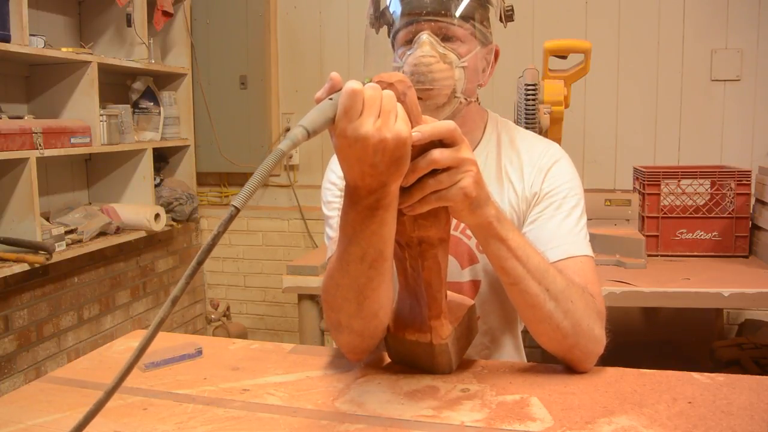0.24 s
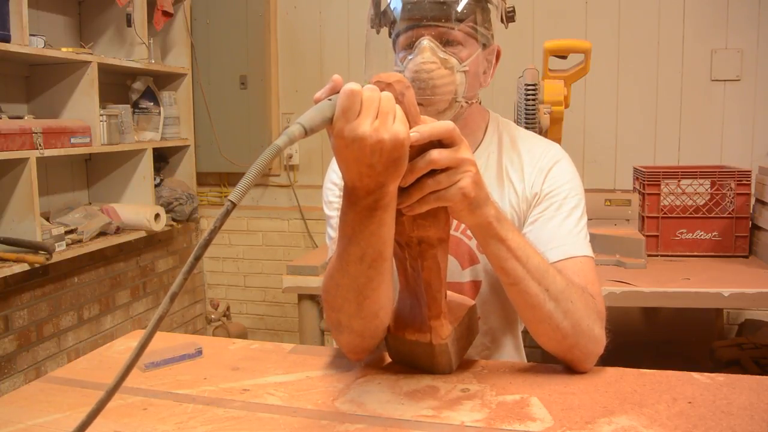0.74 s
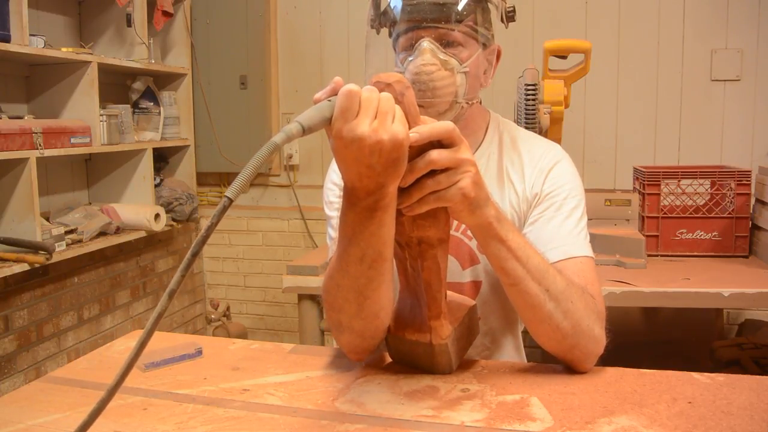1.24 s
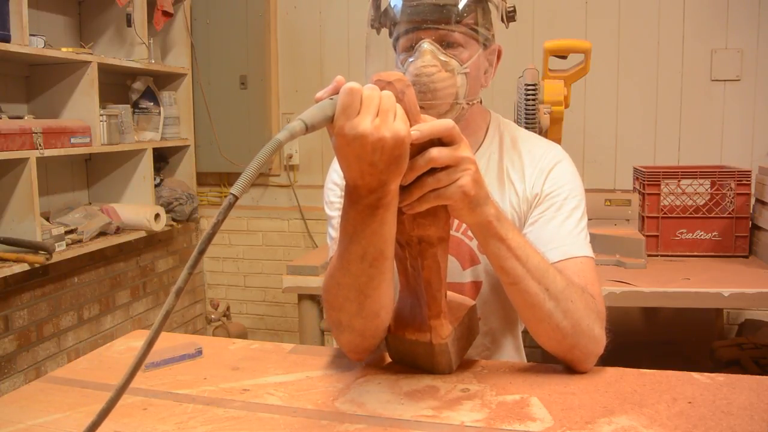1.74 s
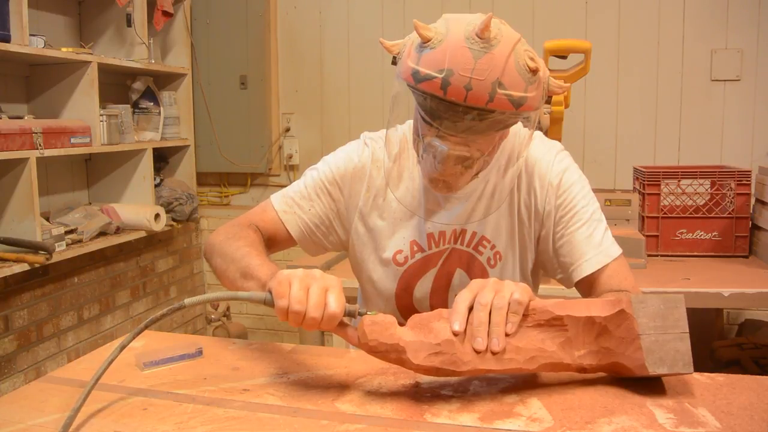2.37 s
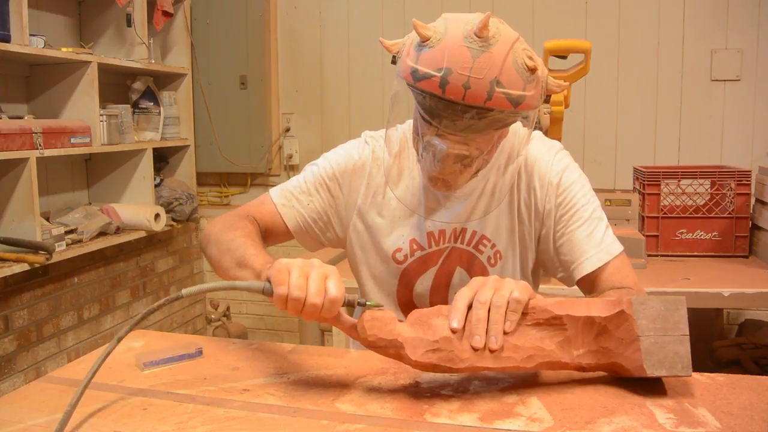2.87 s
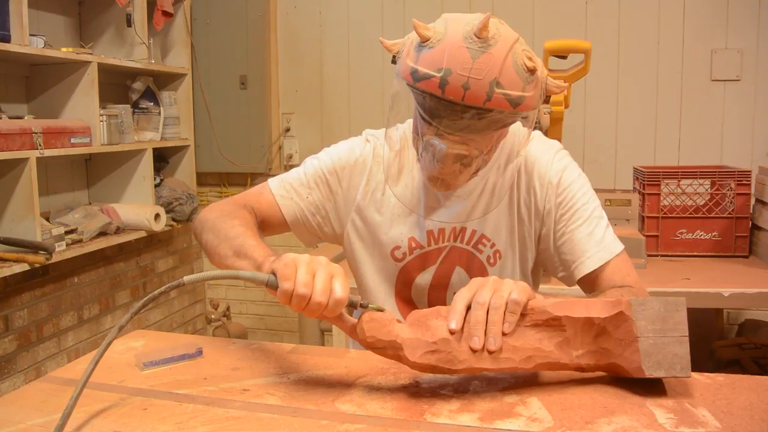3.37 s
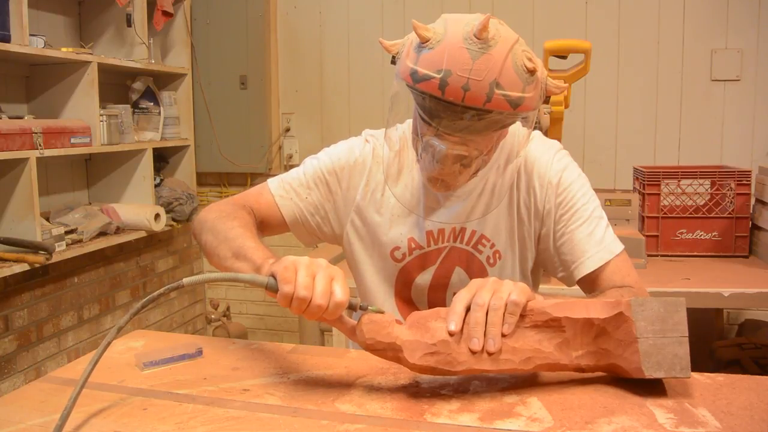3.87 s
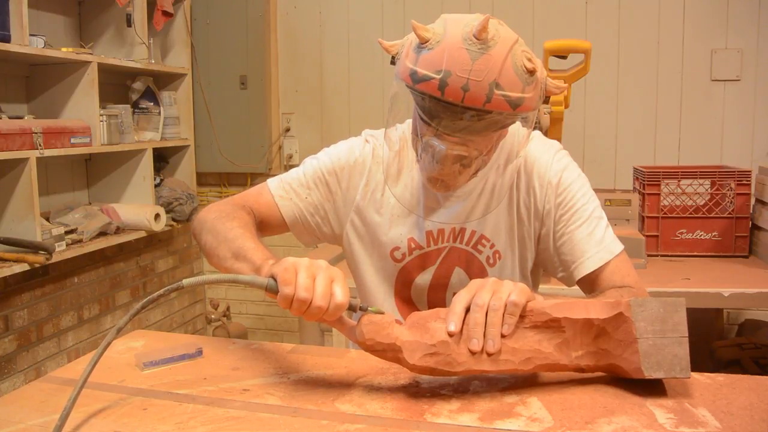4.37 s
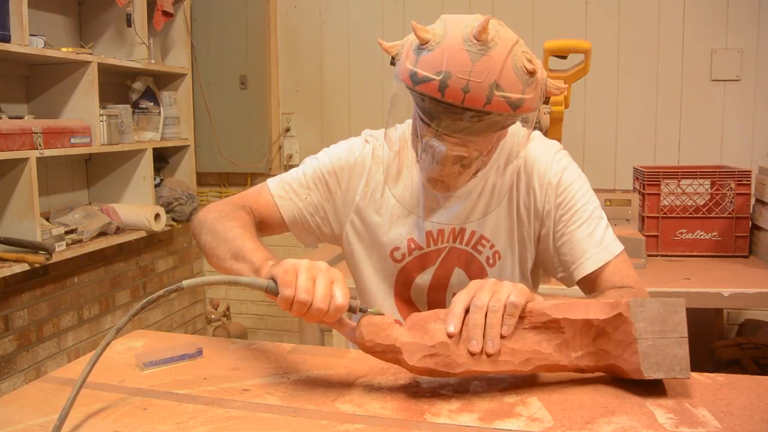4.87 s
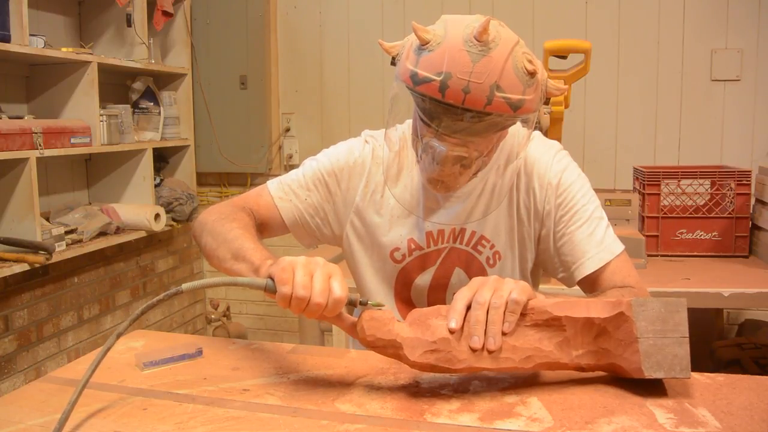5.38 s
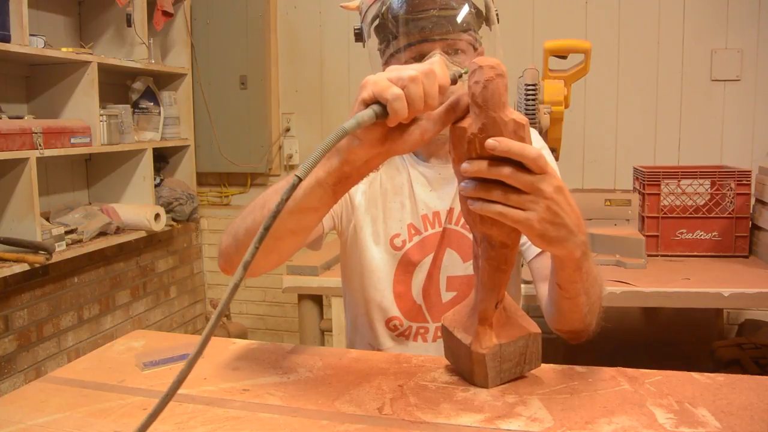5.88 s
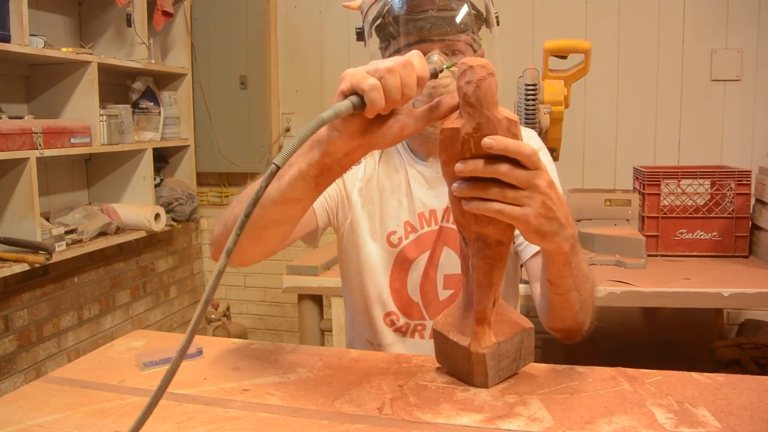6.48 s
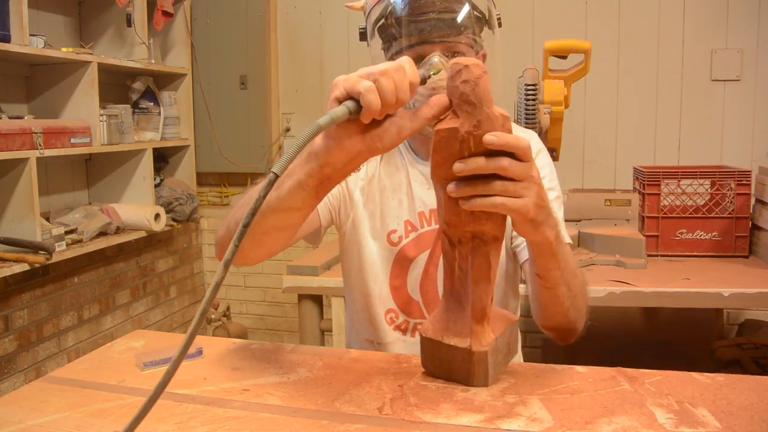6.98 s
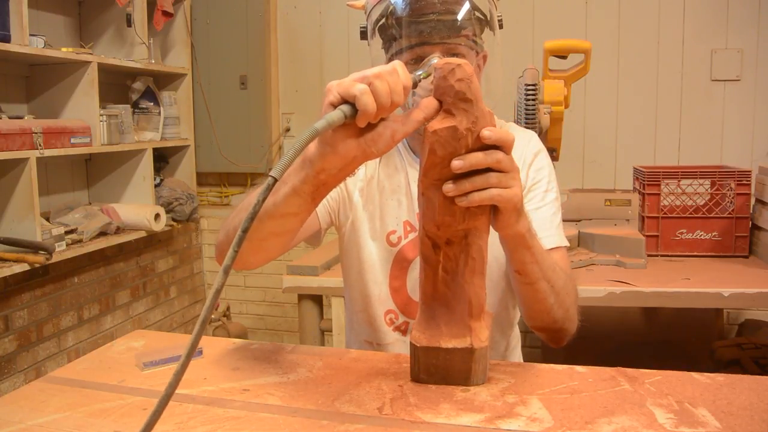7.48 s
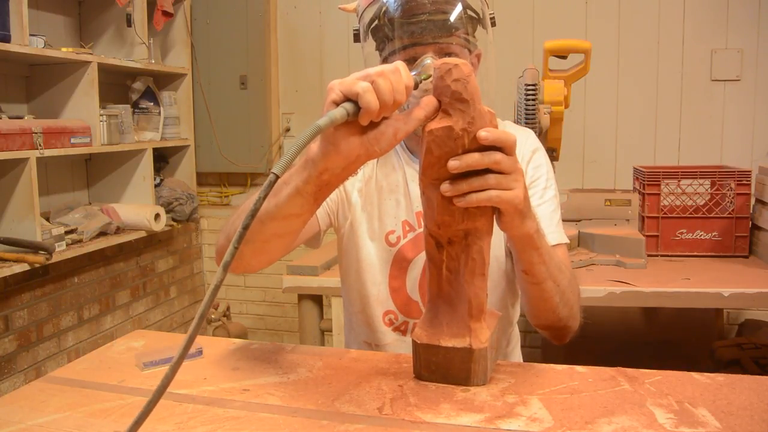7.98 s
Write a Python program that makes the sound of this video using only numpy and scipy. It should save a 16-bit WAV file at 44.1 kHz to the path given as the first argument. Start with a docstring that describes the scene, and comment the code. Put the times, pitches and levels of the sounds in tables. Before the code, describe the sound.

A flexible-shaft rotary tool carves wood, already running at the start and never stopping. Its bright, nasal, buzzing whine is layered with harmonics, rough mains ripple, hissing air and a dry, gritty rasp. From 0 to 2 seconds the pitch wobbles downward and back while short squeals ring out. At 2.0 a soft dull click marks a change of tone; the rasp swells briefly and the block thrums low around 2.2. Squeals return near 2.3, then crowd together from 3.3 to 5.1 as the pitch sags, lowest at about 4.9. A tiny sharp shriek comes at 5.1, then the pitch climbs back. A second, softer click at 5.8 brings another change; after a brief squeal near 5.95 the whine stays higher and steadier, with less thrum, to the end at about 8. Close stereo pickup, noise weighted left, slight wall reflections, barely audible shop rumble and late hum.

```python
"""A flexible-shaft rotary tool carves a block of wood: its motor whines on multiples of the shaft speed,
each with sidebands from the mains ripple. The burr adds chattering tones, a rasp of torn fibres and,
on some strokes, squeals where tones meet a resonance of the wood. A lower shaft speed stands for a harder cut.
Quieter are faint tones between the multiples, a low thrum of the block, hissing air, two dull clicks and the
workshop's rumble and hiss, later with mains hum. The noises are bands of filtered random noise."""
import sys
import numpy as np
from scipy import signal
from scipy.io import wavfile

SR = 44100
rng = np.random.default_rng(int(sys.argv[2]) if len(sys.argv) > 2 else 0)


def store_wav(level_fs):
    """Save 16-bit WAV to argv[1]."""
    pcm = np.round(np.clip(np.atleast_2d(level_fs), -1, 1) * 32767)
    wavfile.write(sys.argv[1], SR, pcm.T.astype(np.int16))


N = 362502
STEP = 16   # samples between the control points of slow changes
TIME = np.arange(N) / SR
SLOW_TIME = np.arange(N // STEP + 2) * STEP / SR
MAINS_RIPPLE_HZ = 120
CRUISE_HZ = 348   # cruising shaft speed, turns per second


def whine(angle, pressure, swell, shade_hz, shade_db, shift_hz, shift_db,
          rough_rate=30, sideband_follow=0.45, shade_width_hz=220, shift_width_hz=200,
          waver_db=1.1, waver_rate=9, grain_roughness=.42, sideband_roughness=.45,
          tooth_ripple=.36, squeal_ripple=.2, squeal_rough_share=.3):
    """Motor and burr sound on multiples of the shaft speed; mains ripple puts a sideband on either side of each."""
    speed = shaft_speed()
    ripple = np.exp(2j * np.pi * MAINS_RIPPLE_HZ * SLOW_TIME)
    turn = np.exp(1j * angle)
    carrier, out = 1, np.zeros((2, N))
    for k, (db, lower_db, upper_db) in enumerate(motor_orders(), 1):
        carrier = carrier * turn
        hz = k * speed
        # the grip changes the level in two regions of pitch
        shade = shade_db * np.exp(-((hz - shade_hz) / shade_width_hz) ** 2)
        shift = shift_db * np.exp(-((hz - shift_hz) / shift_width_hz) ** 2)
        grip = from_db(shade + shift)

        motor = grip * from_db(db + swell.get(k, 0) + waver_db * drift(waver_rate))
        chatter = chatter_power(hz, pressure) * grip ** 2
        squeal = squeal_power(hz)
        # uneven grain roughens the part that the teeth make; a squeal is purer than the chatter
        teeth = np.sqrt(chatter + squeal_rough_share * squeal)
        envelope = np.sqrt(motor ** 2 + chatter + squeal) + grain_roughness * teeth * flutter(rough_rate)

        # the ripple mostly swings the phase, so the two sidebands roughly oppose each other
        swing = ripple * np.exp(2j * np.pi * rng.random())
        cut_ripple = np.sqrt(tooth_ripple ** 2 * chatter + squeal_ripple ** 2 * squeal)
        follow_db = sideband_follow * swell[k] if k in (4, 6) else 0
        for side_db, offset in ((lower_db, -swing.conj()), (upper_db, swing)):
            strength = np.hypot(grip * from_db(side_db + follow_db), cut_ripple)
            grain = 1 + sideband_roughness * pressure * flutter(rough_rate)
            envelope = envelope + strength * grain * offset * np.exp(.5j * drift(2.4))
        start_phase = np.exp(2j * np.pi * rng.random())
        out += tone(envelope * start_phase, carrier, hz.mean())
    return out


# how fast the shaft turns: t/s, turns per second
SHAFT_SPEED = [(0.0, 343.7), (0.46, 344.3), (0.58, 339.3), (0.78, 342.3), (0.94, 337.6), (1.32, 335.4),
               (1.42, 345.5), (1.66, 342.0), (1.92, 331.8), (1.98, 337.0), (2.58, 338.6), (2.78, 344.6),
               (2.88, 342.1), (3.36, 345.7), (3.56, 336.9), (4.08, 331.6), (4.28, 334.5), (4.68, 328.4),
               (4.8, 330.8), (4.92, 322.9), (5.24, 341.8), (5.52, 348.6), (5.78, 344.5), (5.86, 350.2),
               (5.96, 342.7), (6.46, 350.8), (6.82, 347.5), (7.24, 350.7), (7.92, 346.5), (8.2, 349.9)]


def shaft_speed(when=SLOW_TIME):
    """Turns per second; this sets the pitch of every shaft tone."""
    return in_time(SHAFT_SPEED, when)[0]


# motor tones before grip and swells: multiple of shaft speed, level/dB, lower and upper sideband level/dB
MOTOR_TONES = [(1, -40.5, -86.5, -60), (2, -36.5, -60, -52), (3, -40.5, -58, -45.5), (4, -23, -43.5, -33.5),
               (5, -39.5, -52.5, -38), (6, -26.5, -40.5, -30.5), (7, -33, -37.5, -40),
               (8, -41.5, -42, -37.5), (9, -32.5, -44.5, -31.5), (10, -36, -38, -35.5),
               (11, -45.5, -47, -36), (12, -35, -42.5, -42), (13, -41, -41, -36), (14, -46.5, -43, -40)]
# smooth level of the multiples above those: f/Hz, level/dB
TREBLE_TONES = [(5200, -50.5), (6600, -48.5), (7200, -45.5), (8350, -62)]


def motor_orders(count=24, lower_sideband_db=-5, upper_sideband_db=-2.5):
    """Base level of each multiple and of its two sidebands; in the treble the sidebands sit a fixed step below."""
    treble = at_hz(TREBLE_TONES, CRUISE_HZ * np.arange(len(MOTOR_TONES) + 1, count + 1))
    low = [row[1:] for row in MOTOR_TONES]
    return low + [(db, db + lower_sideband_db, db + upper_sideband_db) for db in treble]


# the motor's 4th and 6th multiples swell or sink for a moment:
# start t/s, end t/s, extra level/dB on the 4th, extra level/dB on the 6th
MOTOR_SURGES = [(0.08, 0.463, 3.5, -4.5), (0.496, 0.718, 0, -2), (1.415, 1.58, 4, -2),
                (1.777, 2.016, -0.5, -13), (2.17, 2.283, 2.5, 5.5), (2.37, 2.55, 2.5, 4),
                (2.578, 2.628, -10, -13), (2.72, 3.213, 0.5, -4.5), (4.452, 5.053, 0.5, -4),
                (5.225, 5.7, 1.5, -0.5)]
# the lowest tone dips briefly: t/s, half-length/s, level/dB
LOWEST_DIPS = [(0.2, 0.35, -7), (0.53, 0.04, -8), (0.77, 0.096, -14), (1.43, 0.04, -9), (1.65, 0.08, -19),
               (1.98, 0.036, -12), (2.2, 0.11, -14.5), (2.52, 0.17, -11), (3.58, 0.063, -10),
               (4.18, 0.1, -6), (4.64, 0.1, -8), (5.19, 0.045, -13), (6.0, 0.08, -5)]


def swell_db(speed, lowest_db, third_db, fourth_db, edge_s=0.013):
    """Extra dB by multiple: the 1st, 4th and 6th weaken as the shaft drops below its cruising speed."""
    sag = CRUISE_HZ - speed
    surge_fourth, surge_sixth = sum(np.outer(db, gate(start, end, edge_s)) for start, end, *db in MOTOR_SURGES)
    # the factors of sag are dB per turn per second
    lowest = lowest_db + bumps_db(LOWEST_DIPS) - 0.31 * sag
    fourth = fourth_db + surge_fourth - 0.28 * sag
    sixth = surge_sixth - 0.15 * sag
    return {1: lowest, 3: third_db, 4: fourth, 6: sixth}


# shape of the tooth chatter, tone by tone: f/Hz, relative level/dB
CHATTER_SHAPE = [(340, -56.5), (680, -24), (1020, -7.5), (1400, -23), (1700, -14), (2050, -8), (2350, -8),
                 (2700, -9), (3050, -11), (3500, -10.5), (4100, -16), (4800, -19), (5400, -22), (6200, -20),
                 (7200, -18.5), (8500, -27)]


def chatter_power(hz, pressure, full_load_db=-28.5, load_law=0.44):
    """The teeth strike the wood and strengthen the shaft tones more under a heavier load."""
    bite = from_db(full_load_db) * pressure ** load_law
    return (bite * from_db(at_hz(CHATTER_SHAPE, hz))) ** 2


# firm strokes that set the wood ringing where the burr bites: start t/s, end t/s, ring f/Hz, level/dB
RINGING_STROKES = [(0.36, 0.43, 4820, -35), (0.53, 0.63, 2720, -30), (0.55, 0.68, 5100, -32),
                   (0.82, 0.94, 5080, -31), (0.97, 1.1, 5050, -32), (0.63, 0.93, 2720, -23),
                   (0.7, 0.85, 4790, -37), (0.96, 1.22, 2700, -24), (1.13, 1.22, 3700, -33),
                   (1.17, 1.33, 2350, -31), (1.25, 1.35, 3020, -33), (1.26, 1.4, 2700, -24),
                   (1.55, 1.72, 2740, -31), (1.74, 1.93, 2680, -24), (2.28, 2.58, 4410, -29),
                   (2.35, 2.55, 4060, -34), (2.42, 2.55, 4740, -33), (3.27, 3.43, 2760, -27),
                   (3.25, 3.43, 4830, -30), (3.43, 3.57, 4740, -30), (3.48, 3.8, 5040, -35),
                   (3.5, 3.72, 3700, -33), (3.62, 3.9, 4700, -29.5), (3.66, 3.79, 2690, -27.5),
                   (3.74, 3.9, 3020, -30), (3.76, 4.26, 4000, -32), (3.89, 4.21, 2660, -27),
                   (3.95, 4.5, 4660, -31.5), (4.22, 4.45, 2670, -24), (4.25, 4.43, 3000, -26),
                   (4.28, 4.65, 3660, -31), (4.46, 4.58, 3650, -29), (4.53, 4.86, 2640, -29),
                   (4.7, 5.1, 3950, -34), (4.85, 5.03, 3580, -32), (4.87, 5.0, 4870, -28.5),
                   (5.0, 5.12, 3320, -32), (5.07, 5.14, 2680, -24), (5.727, 5.786, 4810, -28),
                   (5.93, 6.0, 2750, -30), (5.93, 6.0, 3430, -31)]
# the burr catches once and shrieks on several tones: start t/s, end t/s, centre f/Hz, width f/Hz, level/dB
BURR_CATCH = (5.117, 5.137, 4250, 650, -22)


def squeal_power(hz, ring_width_hz=52, edge_s=0.025):
    """Each stroke lifts the tooth tones near a resonance of the wood; the catch lifts a wide band of them."""
    rings = [(start, end, centre, ring_width_hz, db) for start, end, centre, db in RINGING_STROKES]
    power = 0
    for start, end, centre, width, db in rings + [BURR_CATCH]:
        resonance = 1 / (1 + ((hz - centre) / width) ** 2)
        power = power + (from_db(db) * gate(start, end, edge_s) * resonance) ** 2
    return power


def load(free_hz=360, full_sag_hz=30, uneven_db=3.15, uneven_rate=12):
    """Pressure on the burr from how far the shaft is below its free speed, about 1 in a deep cut; grain shakes it."""
    sag = np.maximum(free_hz - shaft_speed(), 1)
    return sag / full_sag_hz * from_db(uneven_db * drift(uneven_rate))


# torn fibres, pitch by pitch: f/Hz, relative level/dB per Hz
FIBRE_NOISE = [(100, -60), (200, -42), (320, -24), (450, -25), (620, -14), (900, -7.5), (1300, 2),
               (1600, -3), (2200, 3.5), (3000, 0.5), (3800, 7.5), (4700, -1), (5500, -11.5), (7000, 1.5),
               (8500, -28)]
# the burr snags briefly: t/s, half-length/s, extra level/dB
BURR_SNAGS = [(2.004, 0.07, 3), (2.2, 0.16, 3.5), (5.128, 0.016, 2), (5.757, 0.015, 3.5), (6.35, 0.031, 3)]


def rasp(angle, pressure, position_db, level_db=-29.7, load_law=0.098, turn_depth=0.42, ripple_depth=0.12):
    """Fibres tear in bursts, once a turn, harder on each push of the mains and where the burr snags."""
    turn_bursts = 1 + turn_depth * np.cos(angle + full_rate(drift(6.6)))
    mains_push = 1 + ripple_depth * np.cos(2 * np.pi * MAINS_RIPPLE_HZ * TIME)
    strength = from_db(level_db + position_db + bumps_db(BURR_SNAGS)) * pressure ** load_law
    return full_rate(strength) * rms_one(turn_bursts * mains_push) * banded_noise(FIBRE_NOISE, patchy_db=1.6)


# faint tones between the shaft multiples; those just above the 4th, 6th and 11th make them throb:
# multiple of shaft speed, relative level/dB
FAINT_TONES = [(3.085, -45), (4.023, -41.5), (6.013, -37.5), (7.17, -44), (11.03, -45)]


def between_tones(angle, position_db, flutter_rate=0.88, level_db=-3.5, waver_db=5.0):
    """Faint tones between the multiples follow the shaft at fixed ratios, each wavering slowly in level."""
    speed = np.mean(shaft_speed())
    out = 0
    for ratio, db in FAINT_TONES:
        strength = from_db(level_db + position_db + db + waver_db * drift(flutter_rate))
        out = out + tone(strength, np.exp(1j * ratio * angle), ratio * speed)
    return out


# low resonances of the block: f/Hz, width f/Hz of each filter pass, relative level/dB
BLOCK_RESONANCES = [(197, 110, -13.5), (485, 47, -0.5), (620, 90, -0.5)]
# the block shudders more, or less, for a moment: t/s, half-length/s, extra level/dB
BLOCK_SHUDDERS = [(1.62, 0.16, -2), (2.22, 0.37, 10), (3.4, 0.18, 3)]


def thrum(pressure, position_db, low_cut_hz=160, load_law=0.6):
    """The cut shakes the low resonances of the block on its bench: noise through narrow filters, twice each."""
    low_cut = signal.butter(4, low_cut_hz, "high", fs=SR, output="sos")
    shake = signal.sosfilt(low_cut, rng.standard_normal(N))
    out = 0
    for hz, width, db in BLOCK_RESONANCES:
        b, a = signal.iirpeak(hz, hz / width, fs=SR)
        ringing = signal.lfilter(b, a, signal.lfilter(b, a, shake))
        out = out + from_db(db) * rms_one(ringing)
    strength = from_db(position_db + bumps_db(BLOCK_SHUDDERS)) * pressure ** load_law
    return full_rate(strength) * rms_one(out)


# rushing air, pitch by pitch: f/Hz, relative level/dB per Hz
AIR_NOISE = [(200, -43.5), (450, -18), (900, 2), (1400, 0), (3000, -5), (5500, 0.5), (7000, 8), (8200, -9),
             (9500, -1)]
# loudness of the hiss: t/s, level/dB
AIR_LOUDNESS = [(0, -35), (2.1, -35.5), (2.9, -34), (3.6, -33.5), (4.3, -38), (5.5, -33.5), (5.9, -35.5),
                (8.2, -34.5)]


def air(ripple_depth=0.043):
    """Brushes and cooling air hiss throughout, pulsing slightly with the mains."""
    level_db, = in_time(AIR_LOUDNESS, TIME)
    pulse = 1 + ripple_depth * np.cos(2 * np.pi * MAINS_RIPPLE_HZ * TIME)
    return from_db(level_db) * pulse * banded_noise(AIR_NOISE, patchy_db=1.0)


# soft dull clicks: t/s, peak level/dB
DULL_CLICKS = [(2.008, -14), (5.777, -16.5)]


def clicks(dull_hz=1800):
    """Single pulses with a quickly fading tail, dulled by a gentle low-pass filter."""
    out = np.zeros(N)
    for s, db in DULL_CLICKS:
        out[round(s * SR)] = from_db(db)
    # the tiny offset keeps the filter away from vanishingly small numbers
    return signal.lfilter([1], [1, -np.exp(-2 * np.pi * dull_hz / SR)], out + 1e-18)


# low rumble of the shop, pitch by pitch: f/Hz, relative level/dB per Hz
SHOP_NOISE = [(30, 22), (70, -2), (120, -1), (200, -14.5), (500, -1), (2000, -35)]


def shop(rumble_db=-80, hum_db=-79, hum_from_s=5.78, hiss_db=-74, hum_waver=1.0, hum_rate=25):
    """A faint lumpy rumble and a thin high hiss, later joined by a wavering mains hum."""
    waver = full_rate(1 + hum_waver * flutter(hum_rate))
    hum_wave = (waver * np.exp(2j * np.pi * MAINS_RIPPLE_HZ * TIME)).real
    hum = from_db(hum_db) * np.sqrt(2) * hum_wave * (TIME > hum_from_s)
    lumps = full_rate(from_db(9 * np.clip(drift(7), -2, 2)))
    rumble = rms_one(banded_noise(SHOP_NOISE, patchy_db=6.5, count=3) * lumps)
    hiss_band = signal.butter(2, [13400, 15000], "band", fs=SR, output="sos")
    hiss = rms_one(signal.sosfilt(hiss_band, rng.standard_normal((2, N))))
    return from_db(rumble_db) * rumble + hum + from_db(hiss_db) * hiss


# working positions, each held until the next: start t/s, extra left minus right level/dB of the noise,
# f/Hz shaded by the grip, shade level/dB,
# centre f/Hz of a second region shifted by the grip, its level change/dB,
# extra level/dB of the lowest tone, the 3rd and the 4th multiple, extra rasp level/dB,
# thrum level/dB at full load, extra level/dB of the faint tones between the multiples
WORKING_POSITIONS = [(0, -0.4, 4300, -19, 3430, 0.5, -1, 4, -5.5, 5, -55.5, 4),
                     (2.005, 0.5, 3060, -2.5, 3840, -7, -2, 2, 0.3, 4, -56, 1.5),
                     (5.778, -1, 2950, -3.5, 3280, -2.5, -1.5, -2, -0.5, 2.3, -69.5, 5)]


def position():
    """The columns of the working position that is held at each moment."""
    return np.transpose(WORKING_POSITIONS)[1:, held()]


def held():
    """Which working position is held at each moment, counted from 0."""
    return np.searchsorted([row[0] for row in WORKING_POSITIONS[1:]], SLOW_TIME)


# how much of a tone comes off the walls: f/Hz, share of its power
WALL_SHARE = [(340, .02), (700, .06), (1050, .22), (1400, .03), (1750, .25), (2100, .06), (2700, .1),
              (4200, .15), (8000, .5)]
# how tones reach the microphones: f/Hz, left lead/rad in the first, second and third position,
# left minus right level/dB in the first, second and third position
TONE_ARRIVAL = [(340, 0, 0, 0, .5, .5, .5), (690, .7, .5, .2, 3, 3, 0), (1030, .5, 1.2, -.8, 4, 2, -2),
                (1380, 1.7, 1.1, 1.5, 6, 4, 4), (2060, 2, 1.9, 2, 2, 0, 4), (2400, 2.3, 2.2, 2.4, -2, 0, 0),
                (2720, 2.0, 5.0, 1.9, -2, -3, -3), (3060, 3.9, 2.6, 2.2, 1, 0, 2),
                (3400, 5.4, 4.3, 4.7, 3, 4, 5), (3750, 6.1, 6.8, 6.1, 3, 0, 10),
                (4100, 7.3, 4.3, 3.1, 2, 5, 13), (4750, 6.6, 4.9, 3.4, 1, -3, 8),
                (5150, 5.7, 5.6, 3.9, -1, 1, 6), (7000, 5.8, 5.8, 5.8, 5, 5, 6)]


def tone(envelope, carrier, hz):
    """A tone at both microphones: lead and balance follow the working position; far wall reflections flutter."""
    scatter = np.clip(at_hz(WALL_SHARE, hz), 0, 1)
    flutter_hz = 2.5 + .001 * hz   # high tones flutter faster
    pitches, *columns = np.transpose(TONE_ARRIVAL)
    by_position = np.reshape([np.interp(hz, pitches, c) for c in columns], (2, -1))
    lead, balance_db = by_position[:, held()]
    left_share = 1 / (1 + from_db(-2 * balance_db))
    out = []
    for share, lag in ((left_share, 0), (1 - left_share, lead)):
        direct = np.sqrt(1 - scatter) * np.exp(-1j * lag)
        reflected = np.sqrt(scatter) * flutter(flutter_hz)
        strength = 2 * np.sqrt(share) * envelope * (direct + reflected)
        out.append((full_rate(strength) * carrier).real)
    return np.array(out)


def flutter(rate):
    """Random strength and phase, as of a tone that arrives by many paths."""
    return (drift(rate) + 1j * drift(rate)) / np.sqrt(2)


# guides how alike the noise is at both microphones: f/Hz, likeness (0 to 1)
NOISE_LIKENESS = [(60, 0.59), (400, 0.81), (1000, 0.92), (2000, 0.027), (4000, 0.86), (8000, 0.71)]


def banded_noise(spectrum, patchy_db, count=18, lead_s=.000125):
    """Bands of stereo noise, each with its own level, flicker and likeness; rms 1."""
    edges = np.concatenate([[20, 70, 150], np.geomspace(280, 10500, count)])
    white, out = rng.standard_normal((2, 2, N)), np.zeros((2, N))
    for k, (low, high) in enumerate(zip(edges, edges[1:])):
        hz = np.sqrt(low * high)
        alike = np.clip(at_hz(NOISE_LIKENESS, hz), -1, 1)
        # a shared noise, and one that is opposite and doubled on the right
        spread = np.array([[1, 1.0], [1, -2.0]]) * np.sqrt([1 + alike, 1 - alike])
        mix = sides(hz)[:, None] * spread
        band_filter = signal.butter(2, [low, high], "band", fs=SR, output="sos")
        band = signal.sosfilt(band_filter, white[k % 2])
        out += mix @ band * full_rate(from_db(at_hz(spectrum, hz) + patchy_db * drift(32)))
    out[1] = np.roll(out[1], round(lead_s * SR))   # the left microphone is nearer
    return rms_one(out)


# balance of the noise: f/Hz, left minus right level/dB
NOISE_BALANCE = [(60, 10), (340, 1), (700, 1.5), (1400, 2.3), (2100, 2.6), (2700, 0.5), (3400, 8.1),
                 (4100, 12), (4800, 7.4), (7000, 9.2)]


def sides(hz):
    """Left and right gain of the noise at this pitch."""
    return rms_one(from_db(at_hz(NOISE_BALANCE, hz) * np.array([.5, -.5])))


def bumps_db(events):
    """Each event is a short, rounded change of level."""
    return sum(db * np.exp(-((SLOW_TIME - s) / length) ** 2) for s, length, db in events)


def gate(start, end, edge_s):
    """Opens between start and end with straight ramps; reaches 1 if there is time for the whole ramp."""
    return np.clip(np.minimum(SLOW_TIME - start, end - SLOW_TIME) / edge_s + .5, 0, 1)


def drift(rate):
    """Slow random wander of spread 1 at the control points: noise smoothed twice at this rate in Hz."""
    r = np.exp(-2 * np.pi * rate * STEP / SR)
    noise = rng.standard_normal(len(SLOW_TIME) + 3000)
    settled = signal.lfilter([1], [1, -2 * r, r * r], noise)[3000:]
    return rms_one(settled)


def full_rate(slow):
    """Join control points by straight lines."""
    lines = slow[:-1, None] + np.diff(slow)[:, None] * (np.arange(STEP) / STEP)
    return lines.ravel()[:N]


def in_time(rows, when=SLOW_TIME):
    """The columns of a curve at the given times."""
    s, *columns = np.transpose(rows)
    return [np.interp(when, s, c) for c in columns]


def at_hz(points, hz):
    """Read a spectrum on a log-frequency axis."""
    pitches, values = np.transpose(points)
    return np.interp(np.log(hz), np.log(pitches), values)


def from_db(db):
    """Decibels to gain."""
    return 10 ** (np.asarray(db) / 20)


def rms_one(x):
    """Scale to unit power."""
    return x / np.sqrt(np.mean(np.abs(x) ** 2) + 1e-20)


def scene():
    """One turning shaft and its load drive the tones and the rasp; a steep low-pass limits the tool's tones and noise."""
    wander = .0003 * drift(19) + .0008 * drift(4)   # small unsteadiness, as a share of the speed
    angle = 2 * np.pi * np.cumsum(shaft_speed(TIME) * (1 + full_rate(wander))) / SR
    (pan_db, shade_hz, shade_db, shift_hz, shift_db,
     lowest_db, third_db, fourth_db, rasp_db, thrum_db, between_db) = position()
    pressure = load()
    swell = swell_db(shaft_speed(), lowest_db, third_db, fourth_db)

    tones = whine(angle, pressure, swell, shade_hz, shade_db, shift_hz, shift_db)
    tones = tones + between_tones(angle, between_db)
    noise = rasp(angle, pressure, rasp_db) + air() + thrum(pressure, thrum_db)
    pan = from_db(full_rate(pan_db) * np.array([[.5], [-.5]]))
    low_pass = signal.cheby2(14, 55, 9750, fs=SR, output="sos")   # 55 dB down from 9750 Hz up
    tool = signal.sosfilt(low_pass, tones + noise * pan)
    return tool + clicks() + shop()


def record(dry):
    """A steep low-pass filter at 15 kHz limits the whole sound."""
    return signal.sosfilt(signal.ellip(10, .1, 80, 15000, fs=SR, output="sos"), dry)


dry = scene()
out = record(dry)
store_wav(out)
```